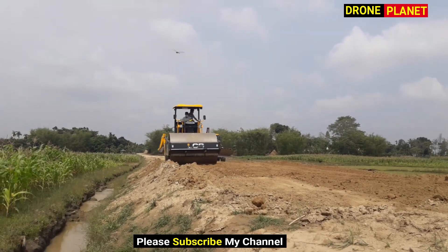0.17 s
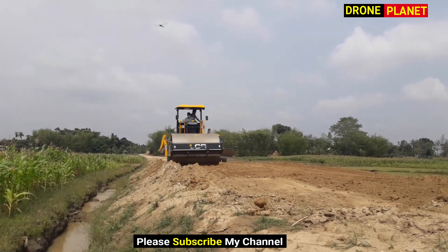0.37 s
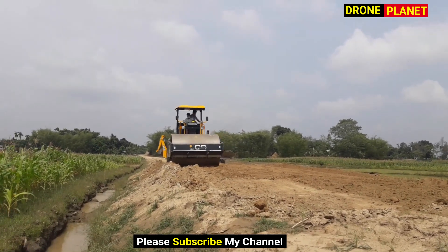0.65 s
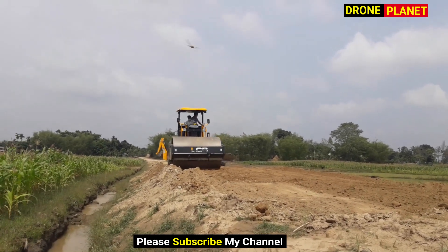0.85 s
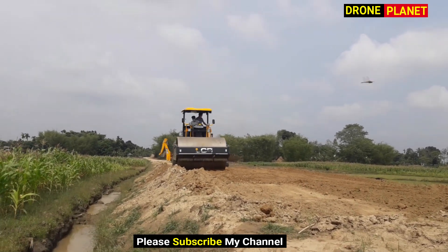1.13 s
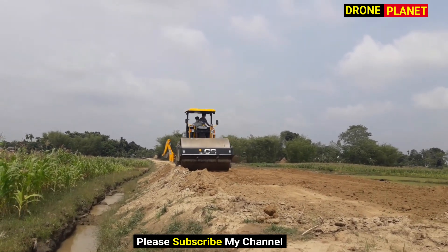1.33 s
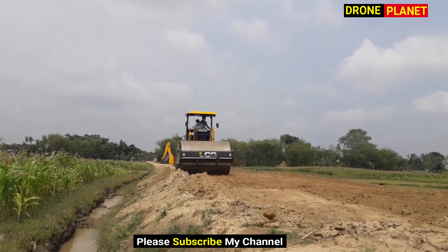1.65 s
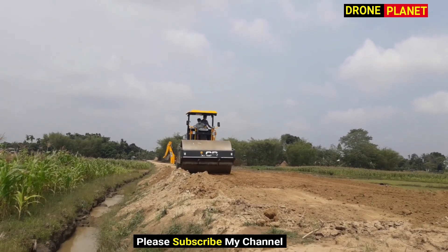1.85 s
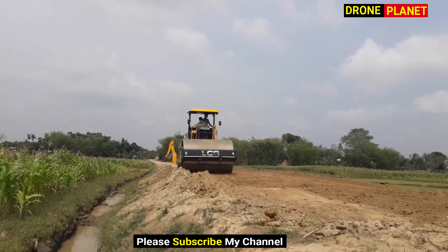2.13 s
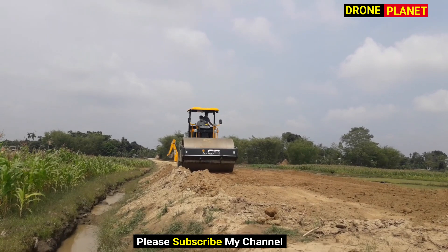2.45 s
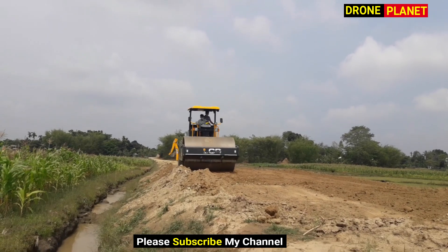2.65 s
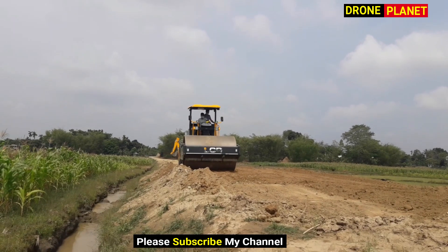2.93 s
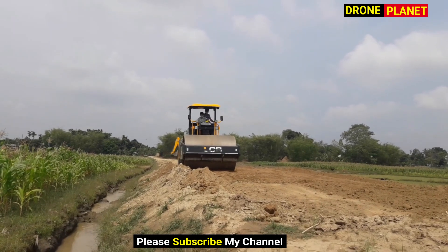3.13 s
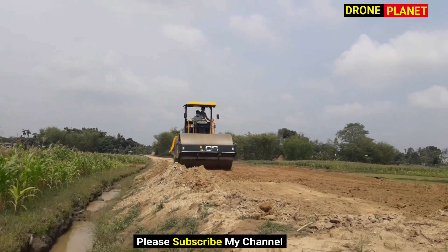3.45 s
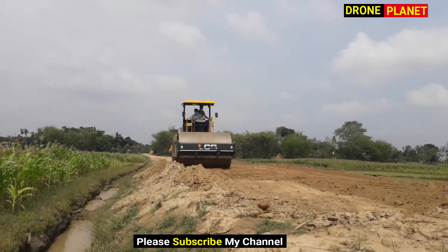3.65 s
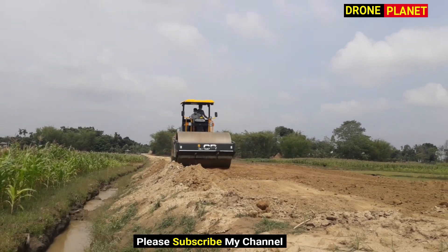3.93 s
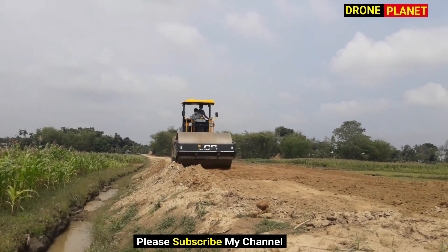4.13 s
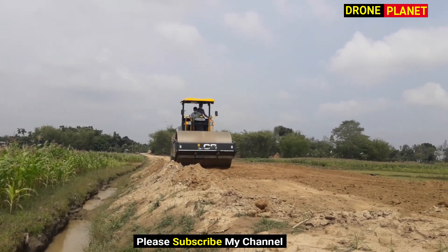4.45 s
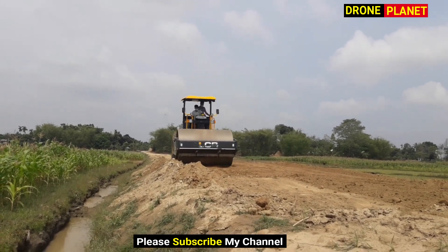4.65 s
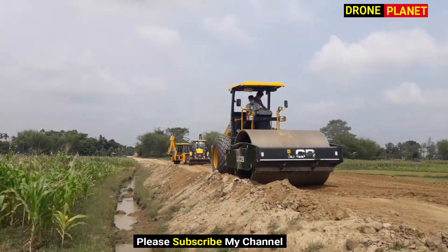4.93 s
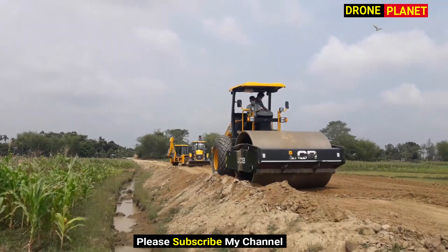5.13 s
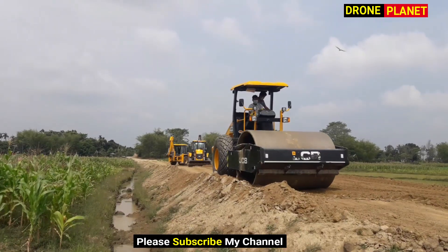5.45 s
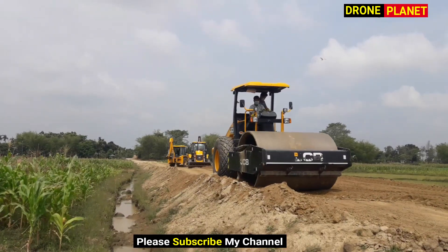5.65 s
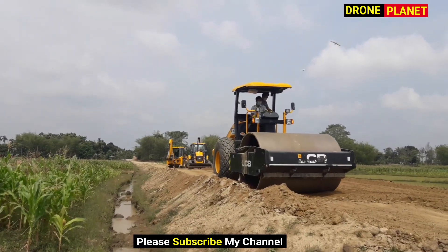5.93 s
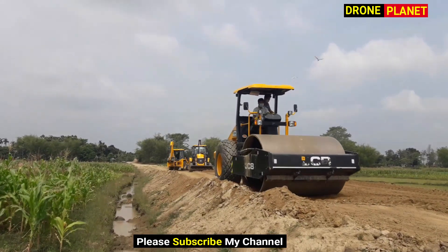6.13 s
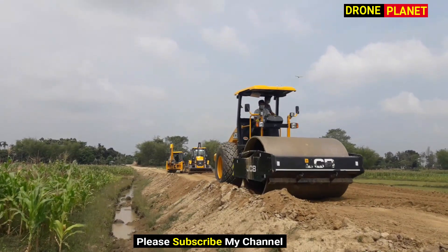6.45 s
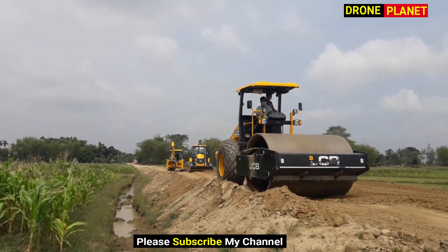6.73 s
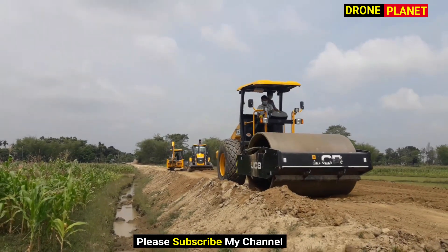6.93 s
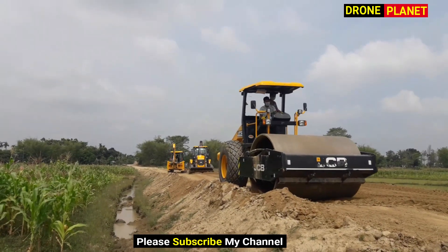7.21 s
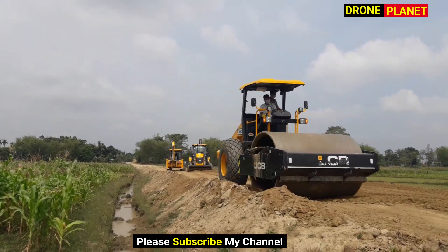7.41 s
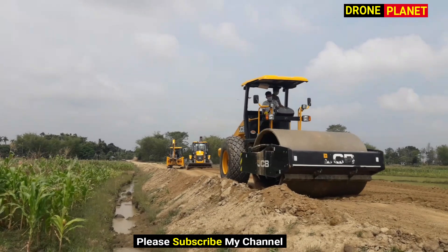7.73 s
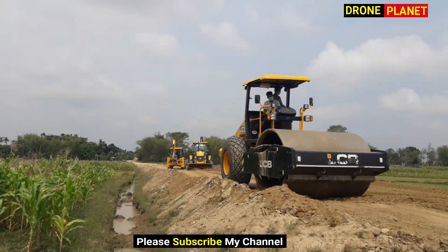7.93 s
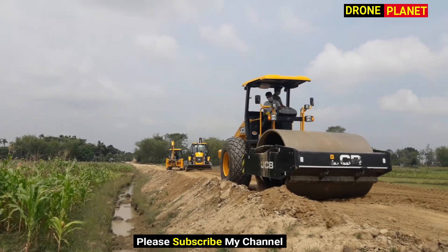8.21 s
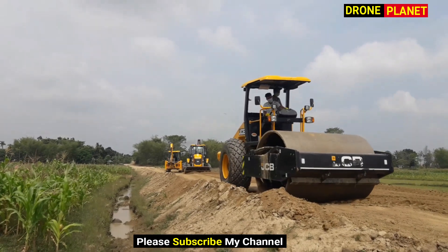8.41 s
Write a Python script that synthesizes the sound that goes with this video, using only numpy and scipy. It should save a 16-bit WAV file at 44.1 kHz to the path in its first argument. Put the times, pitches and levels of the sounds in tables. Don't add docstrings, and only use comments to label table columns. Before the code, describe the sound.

Outdoors on open loose soil, a diesel road roller runs continuously. From 0 to 4.7 seconds it is distant: a steady low drone, engine and vibrating drum at nearly the same speed so their tones beat, over rough exhaust roar and faint panel rattle, growing slightly. A dull grit tick falls at 1.5; low wind thumps hit the microphone around 1.9, 2.9 and repeatedly from 3.5 to 4.3. At 4.7 the sound jumps abruptly to close range, louder and fuller, with buzzing drum tones, rattling sheet metal, fan hiss and a pump hum. A bright tick comes at 4.8, and wind thumps continue until about 5.3. Engine effort swells and sags. From about 6.2 a second engine adds a faint wavering low hum, strongest near 8. Small stones clink on steel at 7.7 and 8.4; the pump hum surges around 8.15, with the engine still running at the end.

```python
import sys
import numpy as np
from scipy import signal
from scipy.fft import rfft, irfft, next_fast_len
from scipy.io import wavfile
from scipy.ndimage import uniform_filter1d

SR = 44100
rng = np.random.default_rng(int(sys.argv[2]) if len(sys.argv) > 2 else 0)


def nominal_scale(level):
    x = np.asarray(level, float) / 20
    return 10 ** x


def store_wav(level_fs):
    pcm = np.round(np.clip(np.atleast_2d(level_fs), -1, 1) * 32767)
    wavfile.write(sys.argv[1], SR, pcm.T.astype(np.int16))


N = 377937
TIME = np.arange(N) / SR
CUT_S = 4.727
NEAR = TIME >= CUT_S
SINCE = np.where(NEAR, TIME - CUT_S, TIME)
THIN = 4


def along(points, hz):
    point_hz, db = np.transpose(points)
    return np.interp(np.log(hz + 1), np.log(point_hz + 1), db, left=-120, right=-120)


def curves(rows):
    seconds, *columns = np.transpose(rows)
    return [np.interp(TIME, seconds, column) for column in columns]


def wobble(rate, time=TIME):
    knots = rng.standard_normal(int(N * rate / SR) + 4)
    return np.interp(time * rate, np.arange(len(knots)), knots)


def coloured(x, spectra):
    size = next_fast_len(N + 8192)
    spectrum = rfft(x, size)
    hz = np.fft.rfftfreq(size, 1 / SR)
    far, near = (irfft(spectrum * nominal_scale(along(points, hz)), size)[:N] for points in spectra)
    return np.where(NEAR, near / near.std(), far / far.std())


def patchy(depth_db, count=10):
    cells = signal.stft(rng.standard_normal(N + 512), nperseg=512)[2]
    field = uniform_filter1d(rng.standard_normal(cells.shape), size=5, axis=0)
    field = uniform_filter1d(field, size=count, axis=1)
    return signal.istft(cells * nominal_scale(depth_db * field / field.std()), nperseg=512)[1][:N]


def band(x, order, low_hz, high_hz):
    return signal.sosfilt(signal.butter(order, [low_hz, high_hz], "band", fs=SR, output="sos"), x)


def dip(x, band_hz, share):
    return x - share * signal.sosfiltfilt(signal.butter(2, band_hz, "band", fs=SR, output="sos"), x)


def angle(hz):
    return 2 * np.pi * np.cumsum(hz) / SR


def tone(order, turn, db, loose):
    time = TIME[::THIN]
    wander = (loose * np.sqrt(order) * np.ones(N))[::THIN]
    size = np.sqrt(2) * nominal_scale(db[::THIN] + np.minimum(5 * wander, 3.5) * wobble(2.5, time))
    phase = rng.uniform(0, 2 * np.pi) + wander * wobble(6, time)
    return size * np.sin(order * turn[::THIN] + phase)


def orders(table, turn, loose):
    return sum(tone(round(2 * k) / 2, turn, np.where(NEAR, near_db, far_db), loose) for k, far_db, near_db in table)


def drifting(row, turn):
    order, far_db, far_drift, near_db, near_drift = row
    db = np.where(NEAR, near_db + near_drift * SINCE, far_db + far_drift * SINCE)
    return tone(round(order), turn, db, loose=.04)


def repeated(turn, low, high):
    k = np.arange(2049)
    lines = ((k >= low) & (k <= high)) * nominal_scale(2 * rng.standard_normal(2049))
    wave = irfft(lines * np.exp(2j * np.pi * rng.random(2049)))
    played = np.interp(turn / (2 * np.pi) % 1 * 4096, np.arange(4096), wave, period=4096)
    return played / played.std() * np.sqrt((high - low) * 31 / (SR / 2))


# time in seconds, drum shaker shaft in turns per second, engine crankshaft in turns per second.
SHAFT_SPEEDS = [(0, 30.63, 31.74), (1.8, 30.6, 31.81), (2.4, 30.67, 31.86), (3, 30.66, 31.88),
                (3.6, 30.68, 31.98), (4.2, 30.85, 31.98), (4.72, 30.87, 31.96), (4.73, 30.77, 31.81),
                (5.2, 30.87, 31.85), (5.6, 30.91, 32.04), (6, 31.17, 32.05), (6.4, 31.21, 32.02),
                (6.8, 31.18, 32.04), (7.6, 31.05, 31.84), (8, 30.92, 31.9), (8.57, 30.94, 31.91)]


def shaft_speeds():
    return curves(SHAFT_SPEEDS)


# multiple of the drum shaft, far level in dB, far drift in dB per second,
# near level in dB, near drift in dB per second.
STRONG_DRUM_TONES = [(1, -39.5, 1.1, -29.5, .5), (3, -28.5, -1.37, -31.5, 0.83), (4, -36, 0.4, -34, 0),
                     (8, -36, 0.23, -26.5, 1.4), (9, -34.5, 0.67, -24.5, -2)]
# multiple of the crankshaft, then the same levels in dB and drifts in dB per second.
FAN_TONE = (12, -39.5, 0.15, -31.5, -0.8)
# multiple of the drum shaft, far level in dB, near level in dB.
DRUM_TONES = [(2, -48, -35), (5, -42, -41), (6, -41, -38), (7, -48, -43), (10, -42, -35), (11, -43, -40),
              (12, -49, -38), (13, -50, -44), (14, -45, -38), (15, -54, -42), (16, -60, -54),
              (17, -57, -55), (18, -47, -55), (19, -48, -49), (20, -47, -44), (21, -48, -51),
              (22, -52, -56), (23, -49, -52), (24, -54, -43), (25, -50, -39), (26, -52, -40),
              (27, -53, -40), (28, -56, -41), (29, -53, -41), (30, -58, -47)]
# multiple of the drum shaft, far level in dB, near level in dB.
MOTOR_WHINE = [(36, -53, -55), (72, -58, -50), (81, -55, -47), (90, -66, -55), (99, -66, -54),
               (108, -70, -57)]
# multiple of the crankshaft, far level in dB, near level in dB.
ENGINE_TONES = [(2, -37, -36), (4, -42, -40), (9, -42, -38), (10, -43, -58), (18, -48, -46),
                (19.5, -47, -43), (24, -51, -53), (30, -57, -52), (45, -54, -63), (54, -60, -52),
                (90, -64, -53), (99, -68, -55)]


def shaft_tones(drum, crank):
    loose = np.where(NEAR, .075, .035)
    tones = sum(drifting(row, drum) for row in STRONG_DRUM_TONES) + drifting(FAN_TONE, crank)
    tones += orders(DRUM_TONES, drum, loose)
    tones += orders(MOTOR_WHINE, drum, loose / 3)
    tones += orders(ENGINE_TONES, crank, loose / 2)
    return signal.resample_poly(tones, THIN, 1)[:N]


# time in seconds, effort in dB.
EFFORT = [(0, -0.5), (.7, -0.5), (1.5, -1), (2, 0), (3.5, -0.5), (4.4, -0.5), (4.72, -1.5), (5, 1.5),
          (5.4, -1), (5.8, 1.5), (6.2, -1.5), (7, 0.5), (7.6, -1.5), (8.2, 1.5), (8.57, 2)]
# far level in dB, near level in dB, share of the nearing (0 to 1), share of the effort (0 to 1).
LAYERS = [
    (-24.5, -20.5, 0.75, 1),
    (-35, -27, 0.93, 0.067),
    (-50.5, -44.5, 0.42, 0.078),
    (-63.6, -54.5, 0.66, .1),
]


def levels():
    nearing_db = SINCE * np.where(NEAR, 0.58, .5)
    effort_db, = curves(EFFORT)
    return [np.where(NEAR, near_db, far_db) + nearing * nearing_db + effort * effort_db
            for far_db, near_db, nearing, effort in LAYERS]


# frequency in Hz, level in dB per Hz.
ROAR_COLOURS = [
    [(20, -25), (45, -15), (78, -7), (110, -1), (140, -1), (200, -1), (260, -2.5), (320, -5), (390, -10), (440, -16), (500, -23), (560, -20)],
    [(20, -21), (45, -14), (78, -9), (110, -3), (140, -1.5), (200, -2), (260, -1), (320, 0), (390, -2), (450, -8), (515, -19), (560, -18)],
]


def exhaust_roar(db, crank):
    cycle = repeated(crank / 2 + 0.018 * wobble(4), low=7, high=27) / np.sqrt(2)
    roar = nominal_scale(db - 3.3) * coloured(patchy(.3) + .8 * cycle, ROAR_COLOURS)
    return dip(roar, (390, 520), ~NEAR * .09 * SINCE)


# frequency in Hz, level in dB per Hz.
PANELS_FAR = [(490, -15), (560, -4), (740, -2.5), (900, -7.5), (1020, -13), (1130, -7), (1480, -7),
              (1580, -13.5), (2100, -14), (2550, -11), (2750, -16.5), (3350, -19.5), (3750, -26),
              (4900, -36)]
# frequency in Hz, level in dB per Hz.
PANELS_NEAR = [(520, -16), (620, -5.5), (830, -1.5), (960, -5.5), (1330, -18), (1470, -10), (1740, -10.5),
               (1800, -17.5), (2300, -16), (2530, -12), (2750, -17), (3200, -16), (3750, -22.5),
               (4900, -38)]


def shaking_panels(db, drum, crank):
    stirring = 1 + .12 * np.cos(drum) + .07 * np.cos(2 * crank) + .05 * np.cos(4 * drum)
    rattle = repeated(drum + .012 * wobble(5), low=31, high=64)
    shake = patchy(.9) * stirring + .85 * rattle
    panels = nominal_scale(db - 1.0 + 0.28 * wobble(8)) * coloured(shake, (PANELS_FAR, PANELS_NEAR))
    return dip(panels, (1830, 3780), NEAR * 0.19 * np.exp(-SINCE / 0.74))


# frequency in Hz, level in dB per Hz.
HISS_COLOURS = [
    [(3900, -2.5), (4500, -6.5), (5100, -2), (5700, -3.5), (6200, -5), (7000, -5), (7500, -12.5), (8200, -33)],
    [(3900, -4), (4500, -5.5), (5100, -2.5), (6100, -3.5), (6850, 0.5), (7200, -2), (7700, -13.5), (8300, -19)],
]


def fan_hiss(db, drum, gust):
    return nominal_scale(db + .45 * gust) * coloured(patchy(1.1, count=20) * (1 + .03 * np.cos(drum)), HISS_COLOURS)


# frequency in Hz, level in dB per Hz.
AIR_COLOURS = [
    [(4470, -21), (7600, -7.5), (8170, -9), (9290, -8), (14400, -7.5), (15600, -16)],
    [(4470, -27), (7600, -4), (7880, -21), (8320, -5), (9520, -6.5), (11300, -5), (14300, -8), (15600, -9)],
]


def air_noise(db, drum, gust):
    return nominal_scale(db + .3 * gust) * coloured(patchy(1.3, count=45) * (1 + .04 * np.cos(drum)), AIR_COLOURS)


def roller():
    drum, crank = (angle(hz) for hz in shaft_speeds())
    roar_db, panels_db, hiss_db, air_db = levels()
    gust = wobble(16)
    noise = exhaust_roar(roar_db, crank) + shaking_panels(panels_db, drum, crank)
    noise += fan_hiss(hiss_db, drum, gust) + air_noise(air_db, drum, gust)
    return shaft_tones(drum, crank) + noise


# start in seconds, peak level in dB, level of the lower band in dB.
TICKS = [
    (1.5377, -28.5, 13),
    (4.5366, -45, -3),
    (4.793, -30, 4),
    (6.8304, -40, 0),
    (7.0574, -40, -2),
    (7.1272, -38, -1),
    (7.7584, -36, -4),
    (8.4193, -42, 3),
    (8.4427, -36, 0),
    (8.4744, -40, 5),
]


def grit():
    high, low, t = np.zeros(N + 256), np.zeros(N + 256), np.arange(256) / SR
    for start, db, low_db in TICKS:
        burst = nominal_scale(db + 10 - 60 * t / .0009) * rng.choice([-1, 1], 256)
        first = round(start * SR)
        high[first:first + 256] += burst
        low[first:first + 256] += burst * nominal_scale(low_db - 14)
    return (band(high, 3, 7300, 14500) + band(low, 3, 3500, 7500))[:N]


# start in seconds, level in dB, swing frequency in Hz, length in cycles.
THUMPS = [(1.9354, -8, 190, 1.2), (1.941, -12, 105, 1.3), (1.9447, -3.5, 290, 3.3), (1.952, -3.5, 151, 1.3),
          (1.966, -14, 125, 2.6), (2.884, -13, 149, 1.8), (2.926, 0, 232, 1.7), (2.94, -10, 110, 1.8),
          (3.506, -12, 110, 1.3), (3.889, -8, 188, 1.5), (4.043, -11, 119, 2.6), (4.105, -4.5, 190, 2.1),
          (4.141, -8.5, 125, 2), (4.223, -5.5, 129, 1.1), (4.2565, 0.5, 138, .8), (4.338, -2.5, 121, 1.3),
          (4.752, -11, 100, 1.9), (4.85, -8, 140, 1.4), (4.879, -6, 130, 1.5), (5.119, -1, 160, 1.3),
          (5.135, -1.5, 100, 1.16), (5.18, -9, 125, 2), (5.304, -7.5, 112.5, 2.2)]


def wind():
    out, t = np.zeros(N + 4096), np.arange(4096) / SR
    for start, db, hz, cycles in THUMPS:
        age = t * hz / max(cycles, .4) * 4.4
        swell = np.sqrt(age) * np.exp(-.6 * age)
        out[round(start * SR):][:len(t)] += nominal_scale(db + 1.0) * swell * np.sin(2 * np.pi * hz * t)
    return band(out[:N], 2, 60, 520)


def travel_pump():
    pump_hz = 7.672 * shaft_speeds()[0]
    surge_s, rise_s = 8.15, 0.11
    surge_db = 5.5 / (1 + np.exp((surge_s - TIME) / rise_s))
    pump_db = -30 + surge_db + 0.5 * wobble(2.5)
    return NEAR * nominal_scale(pump_db + 3) * np.sin(angle(pump_hz))


# time in seconds, level in dB.
SECOND_LEVEL = [
    (6.2, -8),
    (6.8, -15),
    (7.2, -6),
    (8.0, -2),
    (8.57, -20),
]
# frequency in Hz, level in dB.
SECOND_TONES = [(56.9, -35), (113.8, -43.5), (170.7, -32.5), (206.6, -45)]


def second_machine():
    tones = sum(nominal_scale(db + 4.0 + 2.0 * wobble(2.2)) * np.sin(angle(hz + 0.44 * wobble(1.73))) for hz, db in SECOND_TONES)
    return nominal_scale(curves(SECOND_LEVEL)[0]) * tones


# start in seconds, level in dB, ring frequency in Hz, time to fall by 60 dB in seconds.
CLINKS = [
    (7.734, -27, 3050, .05),
    (7.739, -29, 3330, .06),
    (7.745, -30, 3630, .07),
    (8.419, -36, 5900, .02),
    (8.473, -35, 6100, .015),
    (8.488, -35, 6000, .02),
]


def clinks():
    out, t = np.zeros(N + 4096), np.arange(4096) / SR
    for start, db, hz, t60 in CLINKS:
        envelope = nominal_scale(db - 60 * t / t60) * (1 - np.exp(-t / 0.00071))
        out[round(start * SR):][:len(t)] += envelope * np.sin(2 * np.pi * hz * t)
    return out[:N]


def scene():
    return (roller() + grit() + wind() + travel_pump() + second_machine() + clinks())[None]


def low_pass(x):
    return signal.sosfilt(signal.butter(12, 15710, fs=SR, output="sos"), x)


def record(dry):
    return low_pass(dry)


dry = scene()
out = record(dry)
store_wav(out)
```